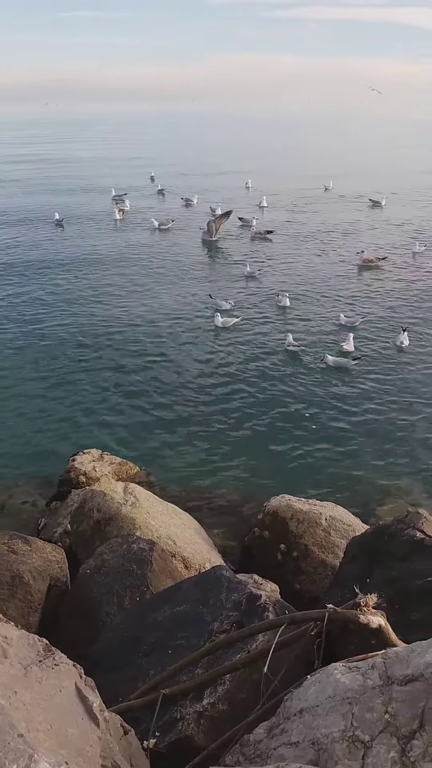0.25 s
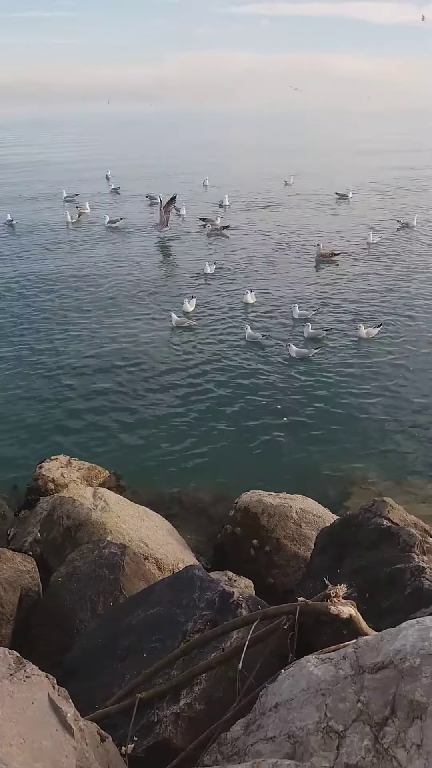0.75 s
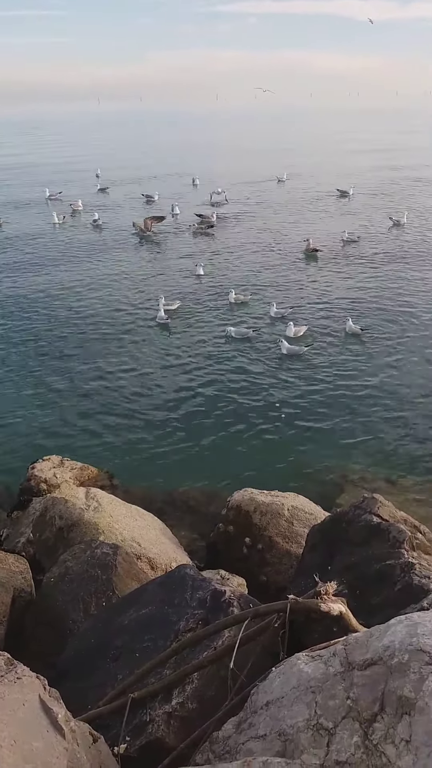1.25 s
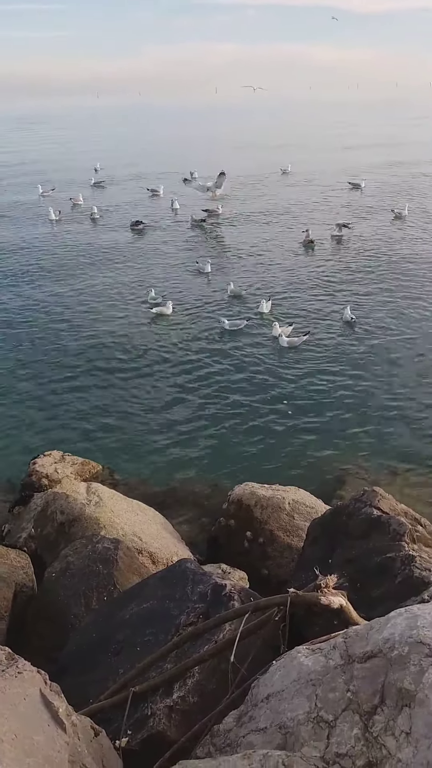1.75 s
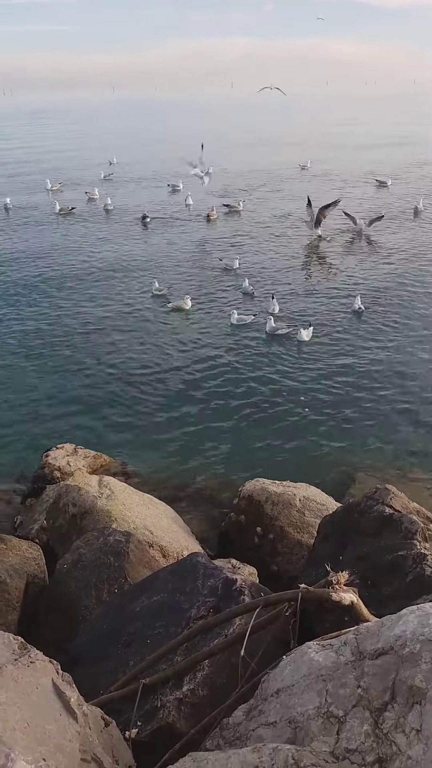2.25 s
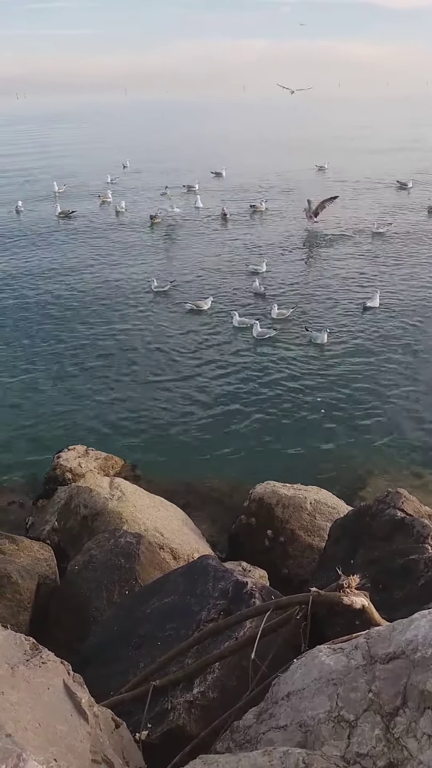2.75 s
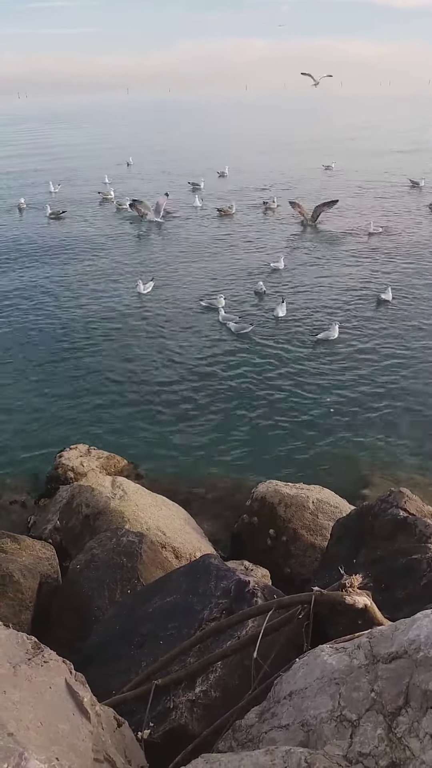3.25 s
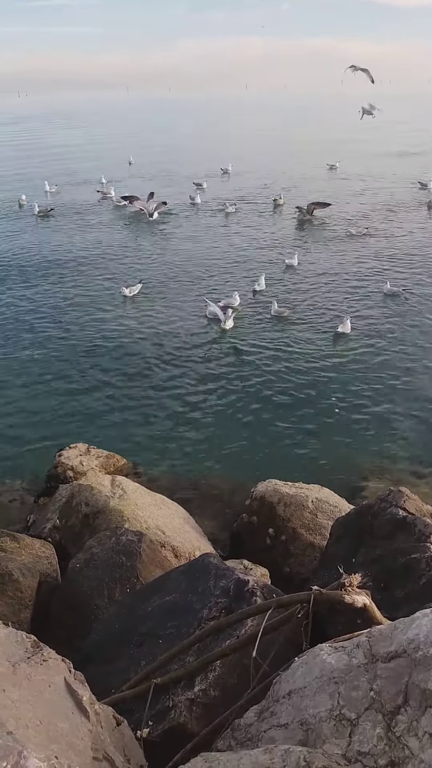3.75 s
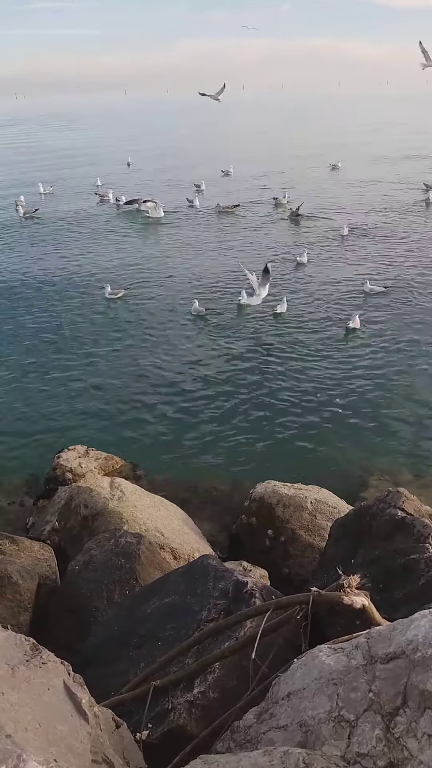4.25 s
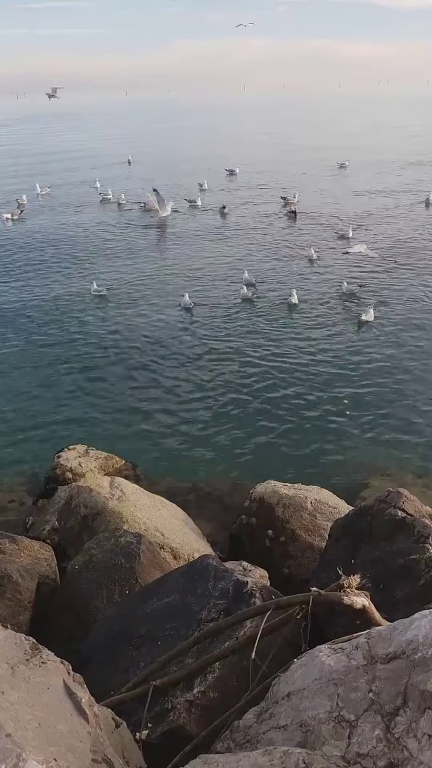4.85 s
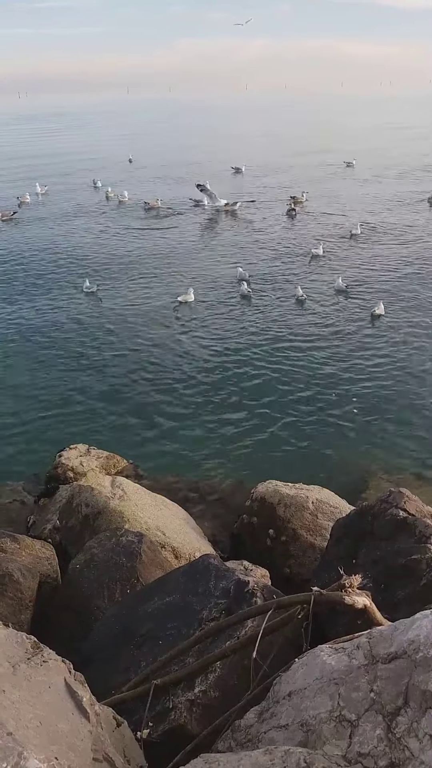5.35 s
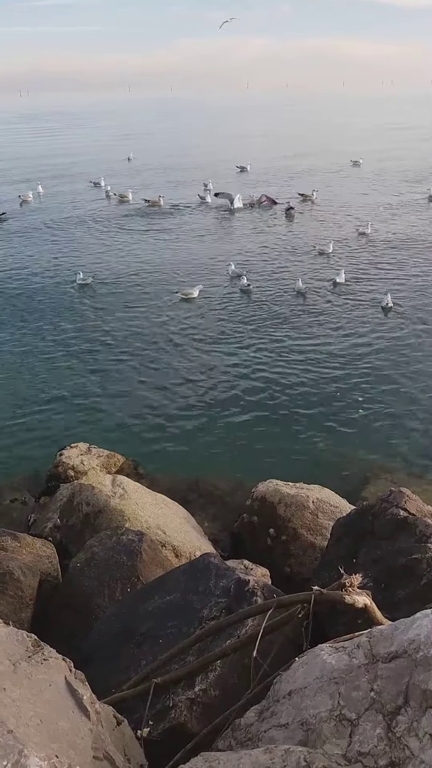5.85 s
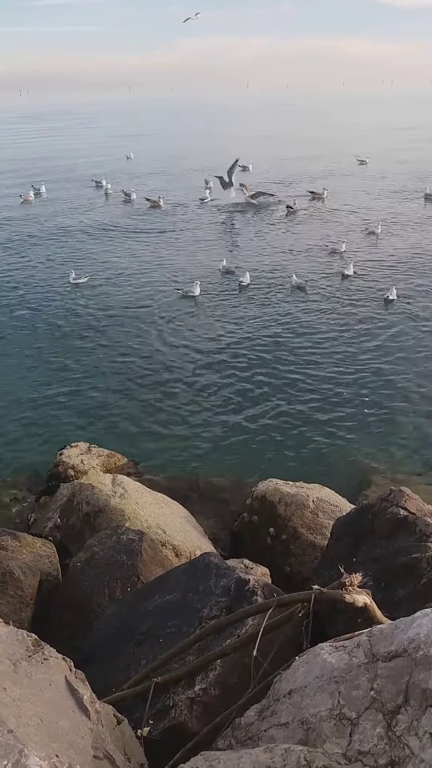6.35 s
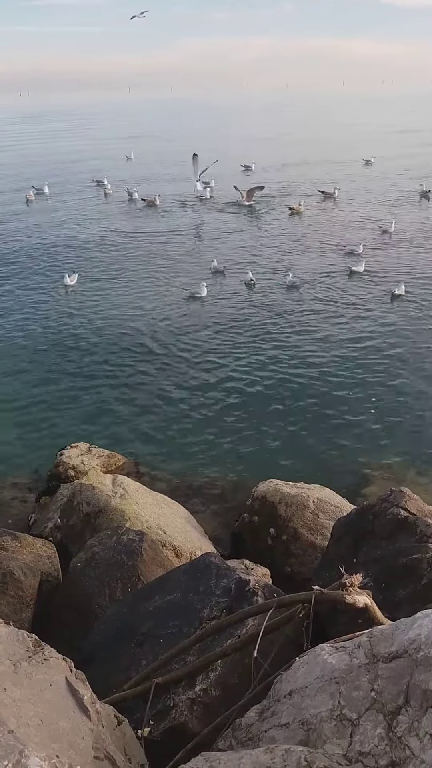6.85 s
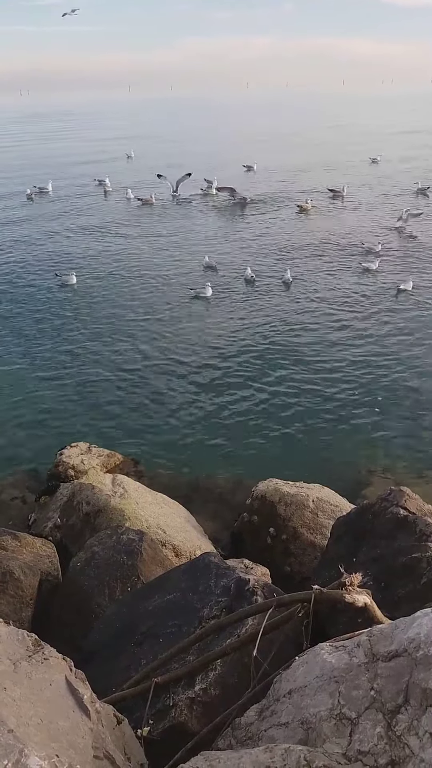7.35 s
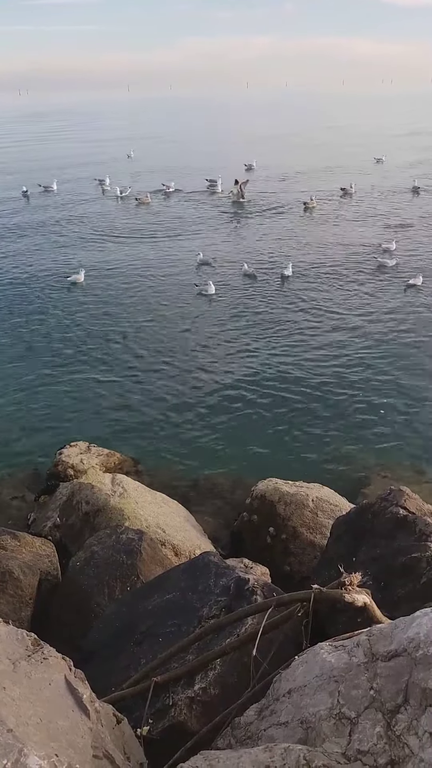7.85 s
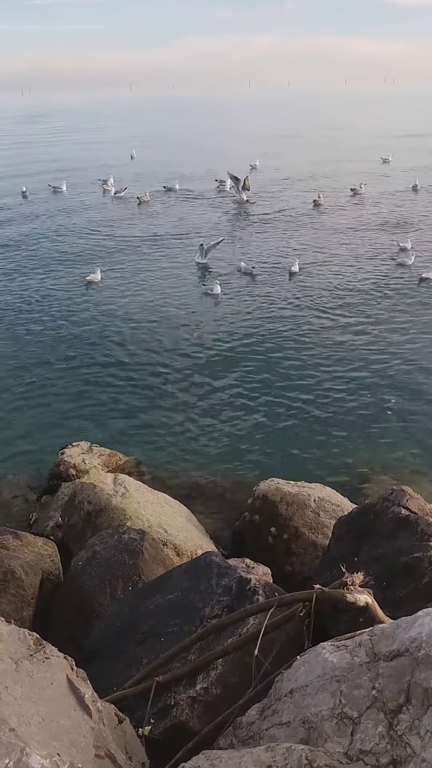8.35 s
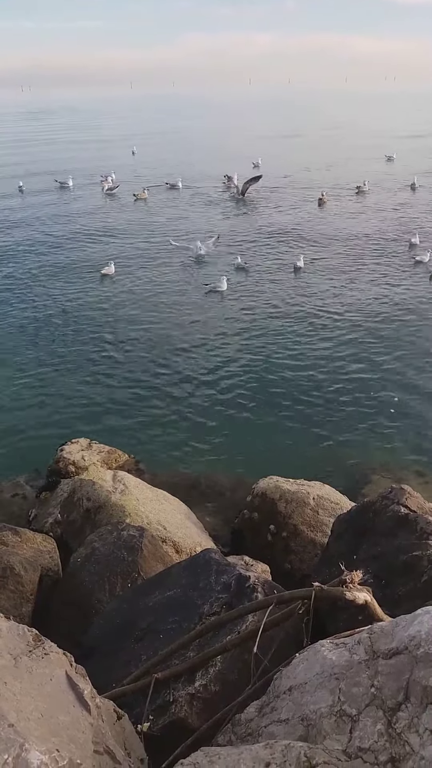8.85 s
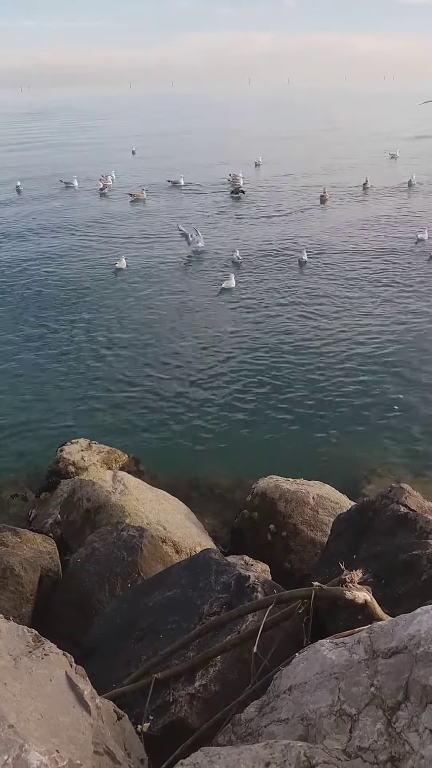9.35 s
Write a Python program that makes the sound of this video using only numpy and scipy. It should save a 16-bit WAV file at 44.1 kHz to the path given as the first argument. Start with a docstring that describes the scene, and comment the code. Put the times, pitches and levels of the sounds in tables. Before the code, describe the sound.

Gulls squeal and screech now and then over calm water as small swells wash, plop and gurgle among shoreline boulders, with a faint far engine drone.

```python
"""Gulls over calm water

From a bank of boulders: gulls squeal, gliding two-voiced tones with overtones, undertones and rasp.
Three low swells wash in as foam noise and bubble crowds, the last still draining at the end; ripples
plop as spray and ringing bubbles, larger bubbles knock, and the rocks return a thin echo. A far engine
drones in steady tones under the filtered-noise shore; wind nudges the microphone in brief low throbs."""
import sys
import numpy as np
from scipy import signal
from scipy.fft import rfft, irfft, next_fast_len
from scipy.io import wavfile
from scipy.ndimage import uniform_filter1d

SR = 44100
rng = np.random.default_rng(int(sys.argv[2]) if len(sys.argv) > 2 else 0)


def output_pcm(signal):
    """Save a mono or channel-first signal as 16-bit PCM at the path in sys.argv[1].

    Samples are clipped to [-1, 1] before scaling.
    """
    pcm = np.clip(np.atleast_2d(signal).T, -1, 1) * 32767
    wavfile.write(sys.argv[1], SR, np.round(pcm).astype(np.int16))


N = 423801
TIME = np.arange(N) / SR


def gain_of(db):
    """Decibels to gain."""
    return 10 ** (np.asarray(db) / 20)


def evened(x):
    """Scales to rms 1."""
    return x / np.sqrt(np.mean(abs(x) ** 2) + 1e-20)


def add(mix, start_s, sound):
    """Mixes a sound in at its start time, cut where the mix ends."""
    part = mix[max(round(start_s * SR), 0):][:len(sound)]
    part += sound[:len(part)]


def coloured(x, points):
    """Filters by a spectrum of (Hz, dB) points, joined along log frequency."""
    hz, db = np.transpose(points)
    size = next_fast_len(len(x), real=True)
    f = np.fft.rfftfreq(size, 1 / SR)
    gain = gain_of(np.interp(np.log(f + 1), np.log(hz), db))
    return irfft(rfft(x, size) * gain, size)[:len(x)]


def wander(rate_hz):
    """Smooth chance of rms 1, its movement falling off steeply above the given rate."""
    size = next_fast_len(N)
    f = np.fft.rfftfreq(size, 1 / SR)
    spectrum = rfft(rng.standard_normal(size)) / (1 + (f / rate_hz) ** 4)
    return evened(irfft(spectrum, size)[:N])


def bubble(hz, t60, rise=.12):
    """A bubble rings down 60 dB in t60 seconds and sharpens as it nears the surface."""
    t = np.arange(int(t60 * SR) + 2) / SR
    ring = np.sin(2 * np.pi * hz * t * (1 + rise * t / t60 / 2))
    decay = np.exp(-np.log(1000) * t / t60)
    onset = (1 - np.exp(-2 * hz * t)) ** 2
    return ring * decay * onset


def engine(drift=0.001, fading_db=0.23):
    """Low engine tones drift together and fade separately on their way over the water."""
    # steady tones of the far engine: pitch_hz, level_db (rms)
    drone = [(59.8, -56.5), (75.1, -46.5), (89.8, -49.5), (114.9, -50.5), (134.8, -54.5), (150.4, -40.5),
             (175.4, -47), (225.5, -57), (401, -58)]
    clock = np.cumsum(1 + drift * wander(0.75)) / SR
    out = np.zeros(N)
    for hz, db in drone:
        level = gain_of(db + fading_db * wander(2.8))
        out += np.sqrt(2) * level * np.sin(2 * np.pi * (hz * clock + rng.random()))
    return out


def shore(rumble_db=-39, hiss_db=-56, swell_db=.5):
    """Distant wind and water: a slightly restless rumble under a smooth hiss."""
    # spectrum of the low rumble: frequency_hz, relative_db (per Hz)
    rumble_points = [(22, -33), (36, -23), (48, -3), (80, 8.5), (170, 6.5), (290, 7), (360, -3.5), (430, 3),
                     (510, -8.5), (900, -8.5), (1200, -13.5), (2500, -49.5)]
    # spectrum of the hiss above it: frequency_hz, relative_db (per Hz)
    hiss_points = [(600, -3), (1500, 15.5), (2800, 5.5), (3700, 6.5), (4300, -2.5), (5000, -23),
                   (6500, -49), (8000, -30), (11000, -15), (15700, -12.5)]
    rumble = evened(coloured(rng.standard_normal(N), rumble_points))
    hiss = evened(coloured(rng.standard_normal(N), hiss_points))
    return rumble * gain_of(rumble_db + swell_db * wander(23.0)) + gain_of(hiss_db) * hiss


def wind(unsteady=0.1206):
    """Each eddy at the microphone gives a soft, low throb a few cycles long."""
    # nudges of wind: middle_s, level_db (rms at the middle), pitch_hz, half_length_s
    buffets = [(3.578, -27.5, 108.7, 0.037), (7.814, -32, 204, 0.028), (8.667, -32.5, 172.7, 0.035)]
    clock = np.cumsum(1 + unsteady * wander(43.3)) / SR
    out = np.zeros(N)
    for middle, db, hz, half in buffets:
        envelope = np.exp(-((TIME - middle) / half) ** 2)
        out += np.sqrt(2) * gain_of(db) * envelope * np.sin(2 * np.pi * hz * clock)
    return out


def surge(lapping_db=-46):
    """Strength of the water: each swell rises, holds and drains away over the steady lapping."""
    # swells among the boulders: start_s, rise_s, hold_s, fall_s, level_db
    swells = [(2.415, 0.48, 0.73, 1.4, -38), (4.8, 0.42, 0.57, 0.65, -48),
              (7.934, 0.63, 0.084, 1.47, -38.5)]
    power = gain_of(lapping_db) ** 2
    for start, rise, hold, fall, db in swells:
        corners = start + np.cumsum([0, rise, hold, fall])
        power = power + (gain_of(db) * np.interp(TIME, corners, [0, 1, 1, 0])) ** 2
    return np.sqrt(power)


def wash(per_s=1400, spread_db=2.5, foam_db=7.5, slosh_db=1.0):
    """Water stirs up foam noise and a crowd of small bubbles between the stones, most in the swells."""
    # spectrum of the moving water: frequency_hz, relative_db (per Hz)
    water_points = [(60, -21), (150, 4.5), (290, 4), (500, -1.5), (820, -4), (1200, -14.5), (2100, -11.5),
                    (2900, -15.5), (3900, -14.5), (5000, -29.5), (6000, -38), (7500, -58), (11000, -42.5),
                    (15000, -61)]
    bubbles = np.zeros(N)
    for hz in np.geomspace(250, 6000, num=30):
        # an even share of per_s at 1 kHz; small, high bubbles are more frequent
        births = rng.random(N) < per_s / 30 / SR * np.sqrt(hz / 1000)
        sizes = np.zeros(N)
        sizes[births] = gain_of(spread_db * np.minimum(rng.exponential(1, births.sum()), 4))
        ring = bubble(hz, 16 / hz + 0.0098)
        crowd = signal.oaconvolve(sizes, ring / np.linalg.norm(ring))[:N]
        bubbles += crowd * (hz / 1000) ** .25
    foam = gain_of(foam_db) * rng.standard_normal(N)  # foam level is relative to the bubbles
    water = evened(coloured(evened(bubbles) + foam, water_points))
    return water * surge() * gain_of(slosh_db * wander(24))


def drips(count=26, level_db=-46, spread_db=3.0, low_hz=1200, high_hz=4500, t60=0.034):
    """Faint plops scattered at random along the bank: rows of start_s, peak_db, pitch_hz, ring_s."""
    return [(when * N / SR, level_db + spread_db * (2 * size - 1), low_hz * (high_hz / low_hz) ** pitch, t60)
            for when, size, pitch in rng.random((count, 3))]


def plops(scatter=0.185, lag_s=0.0021, follower_db=-5, spray_db=-2, spray_share=0.042):
    """A breaking ripple spits a little spray and traps one main bubble, then a few smaller ones."""
    # ripples breaking on stone: start_s, peak_db, pitch_hz, ring_s
    ripples = [ (1.859, -24, 347, 0.082), (1.925, -37.5, 1630, 0.29), (1.944, -37, 1720, 0.14),
               (2.08, -34.5, 1610, 0.058), (2.381, -34.5, 1550, 0.028), (2.397, -34, 1700, 0.032),
               (2.882, -30.5, 846, 0.043), (2.934, -26, 1550, 0.015), (2.934, -52, 5740, .012),
               (2.954, -31.5, 3580, 0.039), (3.054, -23, 312, 0.04), (3.588, -27, 770, 0.035),
               (4.911, -37, 940, .015), (5.413, -54, 11800, .03), (6.333, -37, 2180, .025),
               (6.333, -37.5, 3480, 0.043), (6.334, -52, 4620, .03), (7.455, -34.5, 1480, 0.041),
               (7.868, -40, 4400, 0.043), (8.683, -33, 1500, 0.037), (8.851, -32, 2170, 0.03), ]
    out, t = np.zeros(N), np.arange(SR // 4) / SR
    for start, db, hz, t60 in ripples + drips():
        spray_s = spray_share * min(t60, .06)  # short-ringing ripples break more sharply
        puff = (t / spray_s) ** 2 * np.exp(-t / spray_s)
        spray_points = [(hz / 4, -12), (hz, 0), (hz * 1.3, -5), (hz * 3, -70)]
        spray = evened(coloured(rng.standard_normal(len(t)), spray_points))
        cluster = gain_of(spray_db) * spray * puff / puff.max()
        add(cluster, 0, bubble(hz, t60))
        for detune, wait in zip(rng.standard_normal(size=7), rng.exponential(1, size=7)):
            follower = bubble(hz * np.exp(scatter * np.tanh(detune)), t60 / 2)
            add(cluster, lag_s * wait, gain_of(follower_db) * follower)
        add(out, start, gain_of(db) * cluster / abs(cluster).max())
    return out


def knocks(count=220, level_db=-3, spread_db=13, low_hz=240, high_hz=950, t60=.06):
    """Large bubbles knock in the gaps between boulders, as strongly as the water moves."""
    out, strength = np.zeros(N), surge()
    for when, size, pitch in rng.random((count, 3)):
        ring = bubble(low_hz * (high_hz / low_hz) ** pitch, t60) / (1 + pitch)  # higher is weaker
        level = strength[int(when * N)] * gain_of(level_db + spread_db * size ** 2)
        add(out, when * N / SR, level * ring)
    return out


def boulders(x, wet_db=-23, t60=0.17):
    """The rocks scatter a short, thin echo: sparse random reflections that die away."""
    t = np.arange(SR // 2) / SR
    sparse = rng.standard_normal(len(t)) * (rng.random(len(t)) < .05)
    taps = sparse * (t > .006) * np.exp(-np.log(1000) * t / t60)
    return x + gain_of(wet_db) * signal.oaconvolve(x, taps / np.linalg.norm(taps))[:N]


def note(start, length, first_hz, last_hz, db, loudest, arch_hz=15, under_db=-18, edge_db=-11, curve=1.1):
    """A note glides along one arch, swells and fades: rows (s, Hz, dB), undertone dB, overtone dB."""
    u = np.linspace(0, 1, num=60)
    hz = first_hz + (last_hz - first_hz) * u + arch_hz * np.sin(np.pi * u)
    off_peak = np.interp(u, [0, np.clip(loudest, .02, .98), 1], [1, 0, 1])
    level_db = db + edge_db * off_peak ** curve  # a curve above 1 rounds the peak
    return np.transpose([start + length * u, hz, level_db]), under_db, 0


def gulls(rasp_hz=280, jitter=0.019, uneven=.24, third_db=-3, smear=1.3, clear=.06):
    """The two sides of the syrinx whistle alone or together; together they breed side tones."""
    # cries that glide, swell and fall away: time_s, pitch_hz, level_db
    squeal = [(3.972, 3290, -55), (3.992, 3265, -34.5), (4.04, 3250, -40.5), (4.1, 3240, -39),
              (4.11, 3230, -45), (4.127, 3220, -36.5), (4.163, 3230, -44), (4.185, 3205, -37),
              (4.236, 3110, -35.5), (4.26, 3000, -40.5), (4.334, 2870, -51), (4.366, 2750, -48)]
    yap = [(5.591, 2400, -53), (5.628, 2680, -45), (5.661, 2740, -58)]
    yelp = [(5.652, 3655, -52), (5.664, 3770, -41.5), (5.679, 3680, -54), (5.692, 3755, -42),
            (5.717, 3850, -63), (5.735, 3885, -46), (5.758, 3900, -45), (5.8, 3880, -60),
            (5.83, 3820, -45.5), (5.858, 3850, -41.5), (5.888, 3770, -56)]
    screech = [(5.965, 3760, -54), (5.979, 3830, -44), (6.0, 3810, -36.5), (6.02, 3720, -36),
               (6.031, 3650, -54), (6.08, 3640, -48), (6.097, 3570, -41.5), (6.128, 3640, -43.5),
               (6.139, 3530, -29.5), (6.151, 3450, -29.5), (6.167, 3380, -34), (6.179, 3340, -46),
               (6.196, 3320, -46), (6.21, 3280, -62)]
    whistle = [(6.828, 4110, -61), (6.848, 3880, -54), (6.878, 3760, -47), (6.92, 3630, -57.5),
               (6.98, 3577, -42), (7.134, 3504, -41.5), (7.22, 3407, -32.5), (7.3, 3289, -34.5),
               (7.324, 3257, -44), (7.34, 3290, -59)]
    # cry, undertone_db (at half its pitch), overtones_db
    cries = [(squeal, -12, 0), (yap, 6.5, 0), (yelp, -11, -2), (screech, -19.5, -5), (whistle, -9, 1.5)]
    # short notes, alone or as a second voice, and (at 4.24 s) a brief tone at half the squeal's pitch: start_s,
    # length_s, first_hz, last_hz, level_db, loudest (0-1)
    notes = [ (0.386, 0.069, 3570, 3595, -44, 0.28), (0.437, 0.2, 4300, 4090, -51, 0.3),
             (0.455, 0.14, 3600, 3560, -62, 0.6), (0.629, 0.038, 3600, 3420, -52, 0.3),
             (3.243, .045, 4170, 4120, -50, 0.4), (3.876, 0.037, 3160, 3430, -30, 0.5),
             (3.903, 0.075, 3480, 3340, -41.5, 0.26), (3.944, 0.054, 4120, 3980, -37.5, 0.74),
             (3.988, 0.22, 3950, 3826, -38.5, 0.21), (4.24, 0.03, 1506, 1510, -43, 0.4),
             (5.674, 0.038, 3070, 3120, -45.5, 0.4), (5.711, 0.028, 3120, 3160, -46, 0.6),
             (5.808, 0.066, 3200, 3330, -49.5, 0.4), (6.027, .105, 4310, 4310, -53.5, 0.8),
             (6.767, .028, 3050, 3190, -37.5, .42), (6.798, 0.051, 3300, 3230, -49, 0.6),
             (6.905, .075, 3020, 2920, -56, 0.15), ]
    # stretches rougher than clear: middle_s, half_length_s, added_roughness (0-1), throb_hz, throb_db
    hoarse = [(.52, .06, .06, 45, .8), (4.07, .1, .19, 58, 4.2), (5.76, .09, .24, 110, 2.5),
              (6.098, .03, .22, 165, 3.2), (6.87, .06, .2, 110, 1.5)]
    # how the throat passes the overtones: frequency_hz, gain_db
    overtone_throat = [(4500, -23), (5300, -27), (5850, -11.5), (6500, -49.5), (7050, -42.5), (8800, -52),
                       (10100, -49), (10650, -32), (11400, -44)]
    # how it passes the tones at half the pitch: frequency_hz, gain_db
    undertone_throat = [(1300, 0.5), (1690, -15.5), (1810, 6), (2100, -10.5), (4000, 4.5), (4900, -35)]
    # how it passes the side tones of two voices: frequency_hz, gain_db
    side_throat = [(2500, -6), (3500, -27.5), (4400, -18.5), (4660, -2), (4850, -8), (5100, 6), (5700, -10)]
    # the two sides shake each other only when close in pitch: beat_hz, gain_db
    coupling = [(900, 0), (1400, -30)]

    clock = np.cumsum(1 + uneven * wander(40)) / SR
    rough, throb = clear, 0
    for middle, half, more, throb_hz, depth_db in hoarse:
        strain = np.exp(-np.square(((TIME - middle) / half) ** 2))
        rough = rough + more * strain
        throb = throb + depth_db * strain * np.exp(2j * np.pi * throb_hz * clock)
    quaver = 1 + jitter * rough * wander(90)

    voice, bright, undertones = np.zeros((3, N), complex)
    for rows, under_db, over_db in cries + [note(*row) for row in notes]:
        s, hz, db = np.transpose(rows)
        at = np.arange(int(s[0] * SR), int(s[-1] * SR))
        phase = 2 * np.pi * np.cumsum(np.interp(TIME[at], s, hz) * quaver[at]) / SR
        fade = signal.windows.tukey(len(at), min(.008 * SR / len(at), 1))
        # the two sides throb out of step
        own_throb_db = (throb[at] * np.exp(2j * np.pi * rng.random())).real
        size = np.sqrt(2) * gain_of(np.interp(TIME[at], s, db) + own_throb_db) * fade
        tone = size * np.exp(1j * phase)
        voice[at] += tone
        bright[at] += gain_of(over_db) * tone
        # alternate cycles differ a little, which sounds the octave below and its third multiple
        halves = np.exp(.5j * phase) + 0.15 * np.exp(3j * phase / 2)
        undertones[at] += gain_of(under_db) * size * halves

    strength = np.sqrt(abs(uniform_filter1d(abs(voice) ** 2, size=300)) + 1e-12)
    # each side is shaken at the beat between the two
    beat = abs(voice / strength) ** 2 - 1
    side_tones = voice * coloured(beat, coupling)
    shape = bright / strength
    overtones = voice * shape * (1 + gain_of(third_db) * shape)  # second and third harmonics

    # a hoarse stretch rasps in all partials at once
    rasp = (1 + rough * (wander(rasp_hz) + 1j * wander(rasp_hz))) / np.sqrt(1 + 2 * rough ** 2)
    unsteady = np.exp(1j * smear * rough * wander(120))  # the weaker partials are also smeared in phase
    out = (voice * rasp).real
    weaker = [(overtones, overtone_throat), (undertones, undertone_throat), (side_tones, side_throat)]
    for tones, throat in weaker:
        out = out + coloured((tones * rasp * unsteady).real, throat)
    return out


def scene():
    """Birds and water among the rocks, over the far background."""
    among_rocks = boulders(gulls() + plops() + knocks())
    return (among_rocks + wash() + shore() + engine() + wind())[None]


def record(dry, edge_hz=15800):
    """The recorder's band limit: a low-pass at the edge frequency."""
    low_pass = signal.firwin(511, edge_hz, window=("kaiser", 9), fs=SR)
    return signal.oaconvolve(dry, low_pass[None], "same")


dry = scene()
out = record(dry)
output_pcm(out)
```